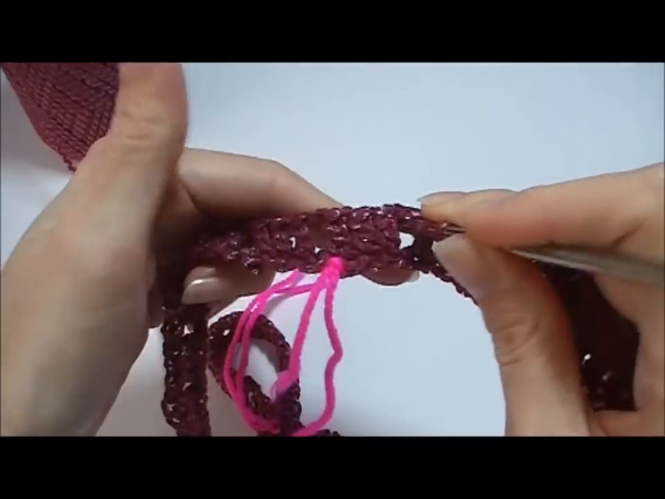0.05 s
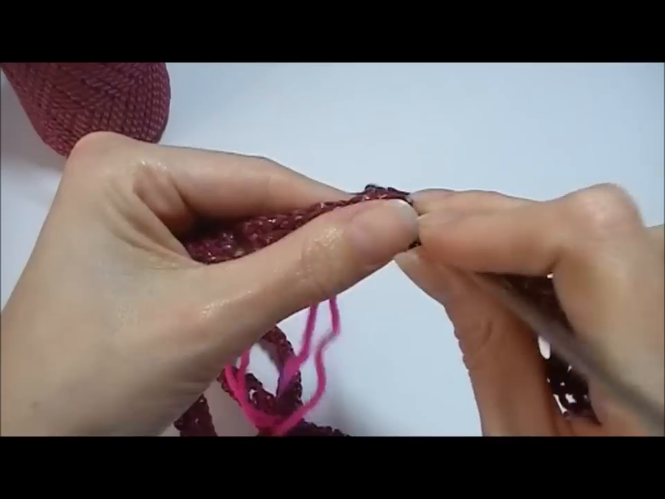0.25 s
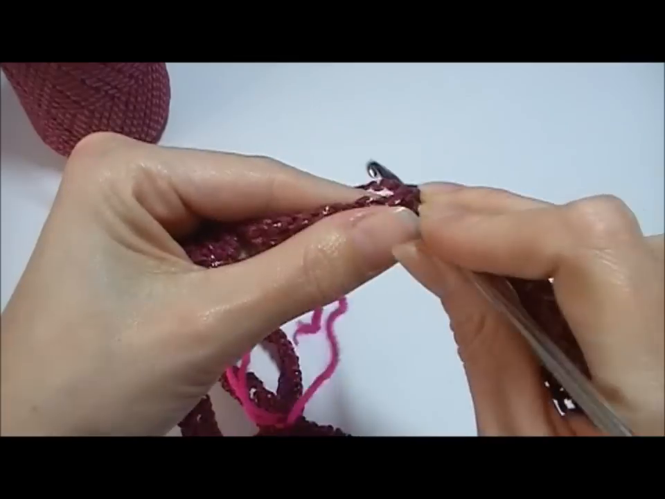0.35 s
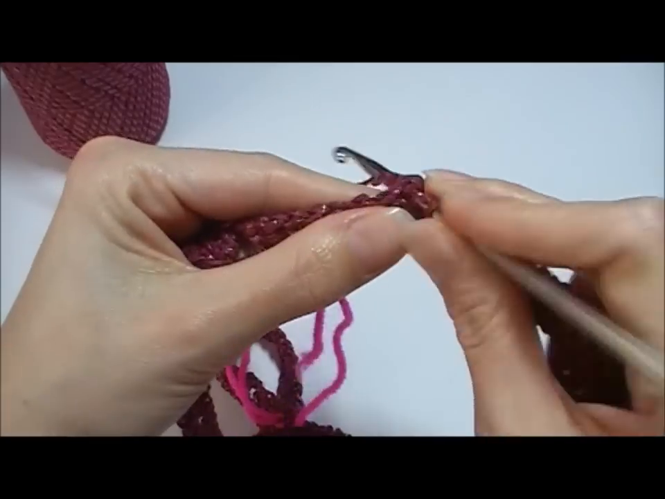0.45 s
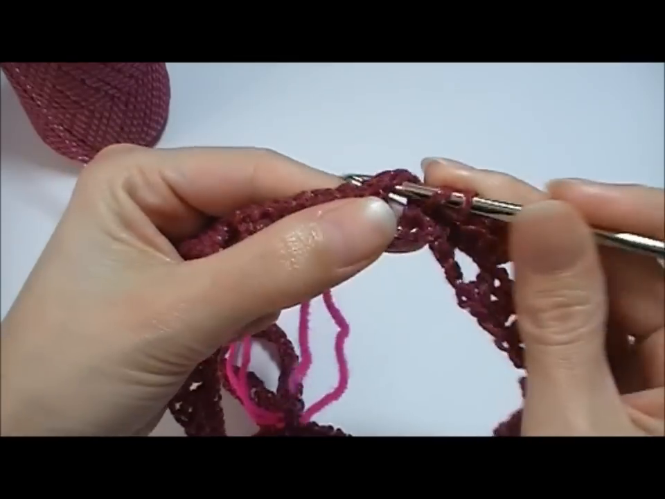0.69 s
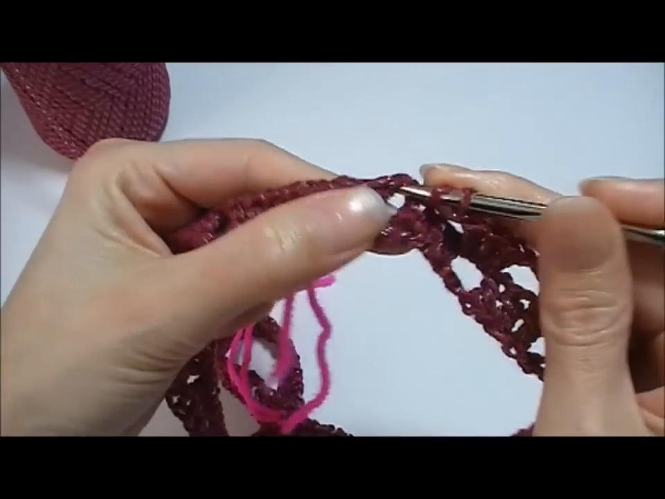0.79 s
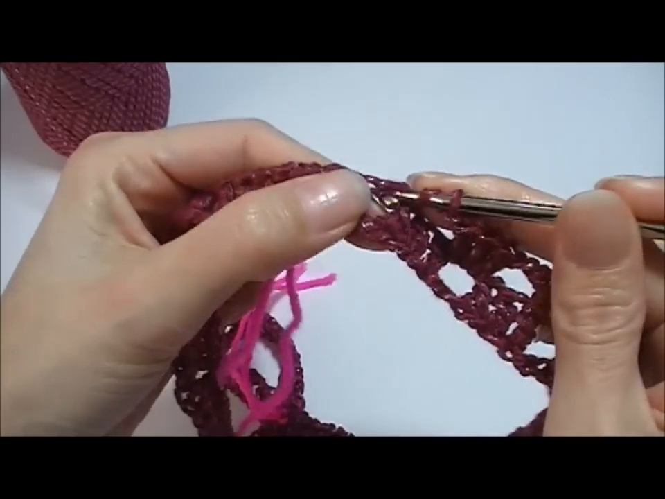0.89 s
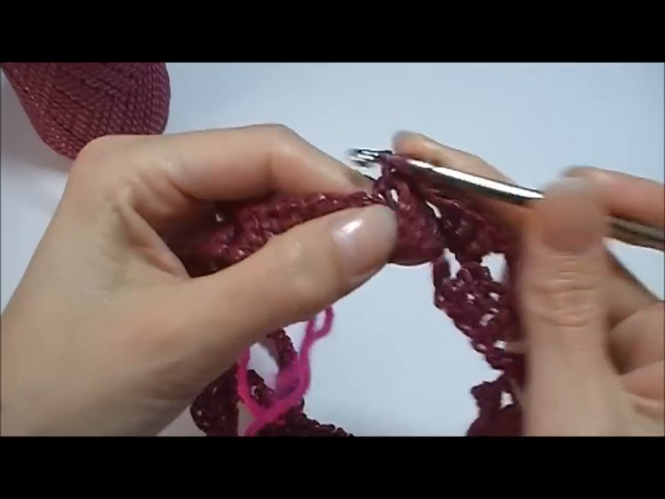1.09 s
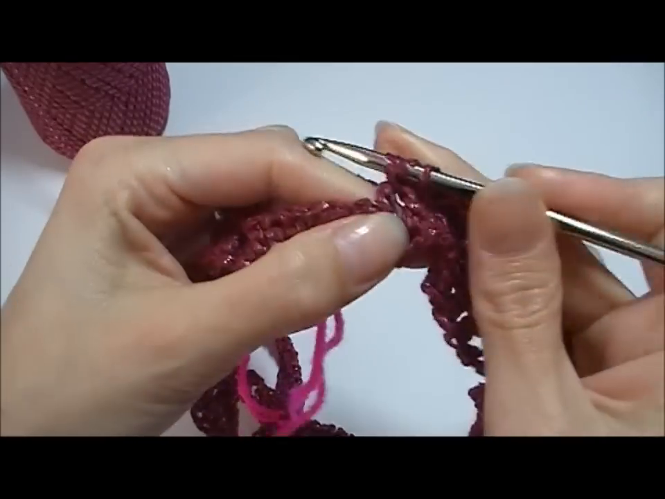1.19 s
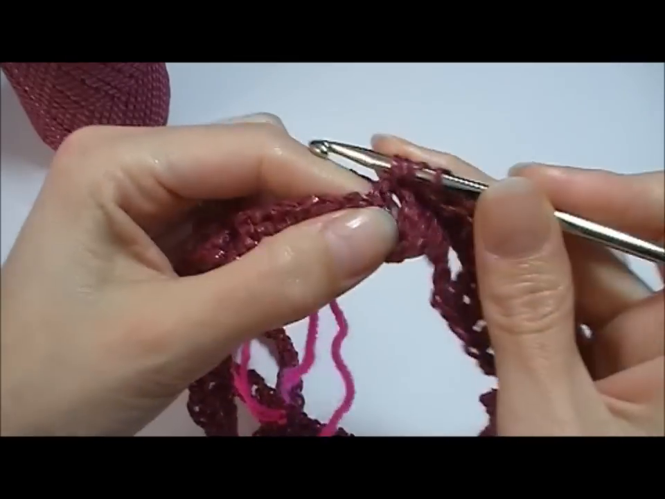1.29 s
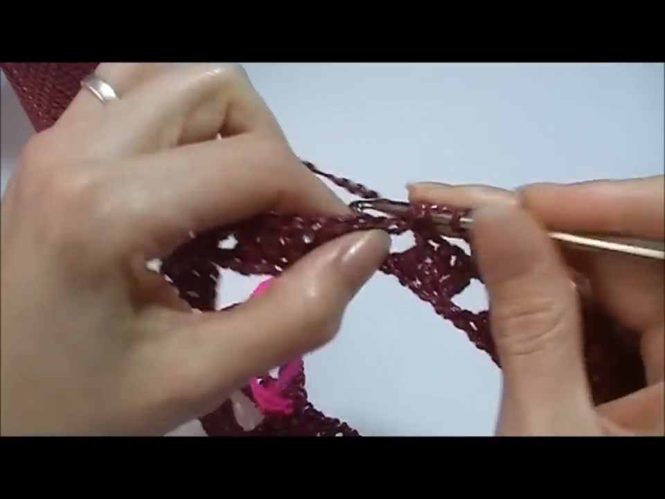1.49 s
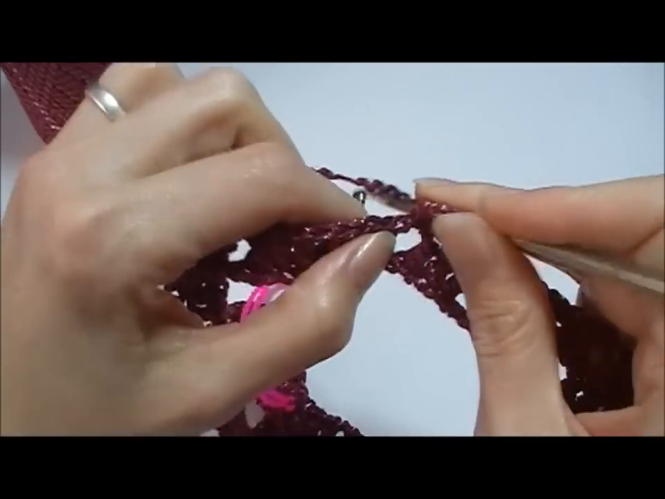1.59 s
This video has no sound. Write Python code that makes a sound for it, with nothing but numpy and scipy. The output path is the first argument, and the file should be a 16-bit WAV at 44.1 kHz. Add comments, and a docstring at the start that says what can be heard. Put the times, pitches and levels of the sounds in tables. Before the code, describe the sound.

Close to the microphone, a metal crochet hook gives one sharp click and a low bump. Yarn then slides over hook and fingers with soft rustles, tiny scratches and several dull knocks, above a quiet room's wide, steady noise.

```python
"""A metal crochet hook works yarn over a table, close up in a quiet room, in stereo.
The hook clicks once, with a low bump after it; two pairs of dull knocks follow, then two faint ones.
Yarn rustles softly as it slides over hook and fingers, fibres snag and the fabric shifts,
above wide, steady room noise."""
import sys
import numpy as np
from scipy import signal
from scipy.fft import rfft, irfft
from scipy.io import wavfile

SR = 44100
rng = np.random.default_rng(int(sys.argv[2]) if len(sys.argv) > 2 else 0)


def materialize(psi):
    """Save the field psi as 16-bit PCM at rate SR to the path in sys.argv[1].

    A 1-D psi becomes a single channel; in a 2-D psi each row is a channel.
    """
    bounded = np.clip(np.atleast_2d(psi).T, -1, 1)
    quanta = np.round(bounded * 32767).astype(np.int16)
    wavfile.write(sys.argv[1], SR, quanta)


N = 72765
T, HZ = np.arange(N) / SR, np.fft.rfftfreq(N, 1 / SR)
CLICK_S = 0.22585
HOOK_RIGHT_LEAD_S, HOOK_RIGHT_DB = 18e-6, -1.5


def amp(db):
    """dB to gain."""
    return 10 ** (np.asarray(db) / 20)


def unit(x):
    """Scale to rms 1."""
    return x / np.sqrt(np.mean(x ** 2) + 1e-20)


def gain_at(colour, hz):
    """Gain of a (f/Hz, level/dB) curve, interpolated over log f."""
    f, db = np.transpose(colour)
    return amp(np.interp(np.log(hz + 1), np.log(f + 1), db))


def noise(colour):
    """Steady coloured noise, rms 1."""
    return unit(irfft(rfft(rng.standard_normal(N)) * gain_at(colour, HZ), N))


def delay(x, s):
    """Fractional-sample delay."""
    hz = np.fft.rfftfreq(2 * N, 1 / SR)
    return irfft(rfft(x, 2 * N) * np.exp(-2j * np.pi * hz * s), 2 * N)[:N]


def convolve(x, response):
    """Convolution, cut to N samples."""
    return signal.fftconvolve(x, response)[:N]


def impulse(colour, size=2048):
    """Causal coloured pulse, energy 1."""
    log_gain = np.log(gain_at(colour, abs(np.fft.fftfreq(size, 1 / SR))))
    pulse = np.fft.ifft(np.exp(np.conj(signal.hilbert(log_gain)))).real
    return np.pad(pulse / np.linalg.norm(pulse), (0, N - size))


def mode(hz, t60_s, age_s):
    """Damped sine."""
    return np.exp(-np.log(1000) * age_s / t60_s) * np.sin(2 * np.pi * hz * age_s)


def tail(t60_s):
    """Decaying noise, energy 1."""
    burst = rng.standard_normal(N) * np.exp(-np.log(1000) * T / t60_s)
    return burst / np.linalg.norm(burst)


def room(x, t60_s):
    """Dense reflections, independent per channel."""
    return np.array([convolve(x, tail(t60_s)) for _ in range(2)])


def swells(rows, shape=2.6):
    """Envelope of hand movements; shape > 2 is flatter and ends more abruptly than a bell curve."""
    power = sum(amp(db) ** 2 * np.exp(-abs((T - s) / half_s) ** shape) for s, half_s, db in rows)
    return np.sqrt(power)


def room_noise():
    """Wide, steady air noise with a faint hum."""
    # noise common to both channels: f/Hz, relative level/dB
    mid_colour = [(20, -2.5), (45, -8), (80, -2.5), (120, -7), (200, -3.5), (260, -4), (420, -10.5),
                  (700, -12), (1400, -14.5), (3000, -17), (5000, -19), (9000, -24.5), (15500, -26.5)]
    # noise opposed between channels: f/Hz, relative level/dB
    side_colour = [(20, -12), (50, -14), (80, 0), (110, -3.5), (180, -0.5), (260, -4), (340, -1),
                   (420, -11.5), (470, -2.5), (620, -8.5), (900, -9), (1300, -13), (2500, -19),
                   (5000, -27.5), (10000, -35.5), (15500, -39)]
    # hum tones: f/Hz, level/dB
    hum = [(130, -66), (459, -76.5)]
    mid, side = amp(-51) * noise(mid_colour), amp(-44.5) * noise(side_colour)
    mid += sum(amp(db) * np.sqrt(2) * np.sin(2 * np.pi * (hz * T + rng.random())) for hz, db in hum)
    return np.array([amp(-0.5) * (mid + side), amp(-1.5) * (mid - side)])


def hook_click():
    """One hard tick with a damped metal ring, close reflections and a faint room tail."""
    # tick spectrum: f/Hz, relative level/dB
    tick_colour = [(100, -14), (550, -22), (850, -11.5), (1400, -14.5), (2300, -11), (3100, -15.5),
                   (4200, -12), (4950, -1.5), (5750, -11), (6400, -12.5), (7200, -8.5), (8200, -3.5),
                   (10500, 0.5), (12300, 0.5), (13200, -5.5), (15300, -9), (16500, -5.5)]
    # room return: f/Hz, relative level/dB
    room_colour = [(100, -7), (1000, 1), (2700, -2), (3600, -5), (4900, -4), (6200, -7), (8500, 1),
                   (11700, -1), (12400, 6), (13500, -4), (15500, -20)]
    # hook modes: f/Hz, level/dB, t60/s, right gain (negative: opposed)
    modes = [(5140, -36, 0.0068, 0.96), (10900, -24, 0.0065, -0.9), (12050, -19.5, .010, -0.89)]
    # reflections off hands, table and camera: delay/s, left/dB, right/dB
    reflections = [(.00046, -17, -8), (.00098, -10, -25), (.00174, -11, -29)]
    tick, channels = impulse(tick_colour), []
    for is_right, reverb in enumerate(room(impulse(room_colour), t60_s=0.26)):
        ring = sum((right_gain if is_right else 1) * amp(db) * mode(hz, t60_s, T)
                   for hz, db, t60_s, right_gain in modes)
        echoes = sum(amp(levels_db[is_right]) * delay(tick, s) for s, *levels_db in reflections)
        channels.append(tick + ring + echoes + amp(-13.5) * reverb)
    scatter = amp(-1.5) * convolve(tick, tail(t60_s=0.011))
    left, right = np.array(channels) + scatter
    right = amp(HOOK_RIGHT_DB) * delay(right, CLICK_S - HOOK_RIGHT_LEAD_S)
    return amp(-1.5) * np.array([delay(left, CLICK_S), right])


def bump(rise_s=0.0068, right_db=-15):
    """Low modes dying away after the click, stronger on the left."""
    # low modes: f/Hz, level/dB, t60/s
    modes = [(82, -38.5, 0.21), (127.8, -39, 0.35), (179.7, -47.5, 0.48)]
    age_s = np.maximum(T - CLICK_S, 0)
    ring = sum(amp(db) * mode(hz, t60_s, age_s) for hz, db, t60_s in modes)
    ring *= np.minimum(age_s / rise_s, 1)
    return np.array([ring, amp(right_db) * ring])


def yarn_rustle(slips_per_s=9000, catch_s=0.006, catch_db=0.2, right_db=-0.5):
    """Dense, tiny fibre slips under each stroke; slight flutter as the strand catches and slides."""
    # yarn strokes: peak t/s, half length/s, level/dB; side-channel gain
    strokes = [(0.325, 0.028, -56.5, 0.9), (0.424, 0.057, -63, 1), (0.508, 0.017, -62, 1),
               (0.63, 0.11, -58, 1), (0.747, 0.047, -57.5, 1), (0.865, 0.05, -58, .05),
               (0.941, 0.018, -59, 0), (1.062, 0.077, -55, .05), (1.152, 0.029, -51.5, 0),
               (1.269, 0.04, -55, .05), (1.393, 0.051, -53.5, .05), (1.58, 0.22, -63, 1)]
    # slip spectrum: f/Hz, relative level/dB
    colour = [(500, -18), (2000, -4.5), (3500, -7), (5000, 0), (6200, -0.5), (8000, 2), (11000, 5),
              (12400, 5), (13500, -.5), (15500, -8)]
    strokes = np.array(strokes)
    slips = (rng.random((2, N)) < slips_per_s / SR) * rng.standard_normal((2, N))
    flutter = amp(catch_db * np.interp(T / catch_s, np.arange(N), rng.standard_normal(N)))
    envelope = swells(strokes[:, :3])
    mid, side = (envelope * unit(convolve(train * flutter, impulse(colour))) for train in slips)
    side *= np.interp(T, strokes[:, 0], strokes[:, 3])  # near mono at 0.85-1.42 s, as in coded audio
    return np.array([mid + side, amp(right_db) * (mid - side)])


def knocks(wall_delay_s=0.0063, wall_db=-15):
    """Soft blows, each a few low cycles that swell and die, answered by a near wall and the room."""
    # dull knocks: t/s, level/dB, f/Hz, rise/s, right gain/dB
    blows = [(0.3871, -25.5, 400, .0027, -19), (.4696, -35, 410, 0.0043, -14.5),
             (0.641, -30, 397, 0.00249, -3.5), (0.7243, -31.5, 395, .0028, -16),
             (1.169, -39.5, 426, 0.0033, -17), (1.3680, -43, 374, 0.003, -15)]
    # room return: f/Hz, relative level/dB
    room_colour = [(60, -3), (160, 0), (400, 10), (800, -0.5), (1200, -18), (3000, -38), (10000, -57)]
    near, hits = np.zeros((2, N)), np.zeros(N)
    for s, db, hz, rise_s, right_db in blows:
        age_s = np.maximum(T - s, 0)
        envelope = (age_s / rise_s * np.exp(1 - age_s / rise_s)) ** 3
        blow = -amp(db) * envelope * np.sin(2 * np.pi * hz * age_s)
        near += np.array([blow, amp(right_db) * blow]) + amp(wall_db) * delay(blow, wall_delay_s)
        hits[round((s + rise_s) * SR)] = amp(db)
    return near + amp(8.5) * room(convolve(hits, impulse(room_colour)), t60_s=0.36)


def snags():
    """Short bright scratches as fibres snag and slip off the hook."""
    # snags: t/s, level/dB
    events = [(.510, -31), (.556, -35), (.944, -38), (1.118, -37), (1.145, -31), (1.4284, -23)]
    # scratch spectrum: f/Hz, relative level/dB
    colour = [(1000, -16), (7000, -15), (10500, 8), (12500, -1), (15000, -27)]
    bursts = sum(amp(db) * delay(tail(t60_s=0.018), s) for s, db in events)
    scratch = convolve(bursts, impulse(colour))
    return np.array([delay(scratch, HOOK_RIGHT_LEAD_S), amp(HOOK_RIGHT_DB) * scratch])


def fabric_shifts():
    """Fabric moving in the hands: brief, dull, centred swells of noise."""
    # movements: peak t/s, half length/s, level/dB
    shifts = [(.765, 0.013, -57), (.972, 0.014, -53), (1.362, 0.019, -53.5)]
    # fabric spectrum: f/Hz, relative level/dB
    colour = [(40, -9), (150, -18), (250, -0.5), (380, -12), (700, -16), (2000, -21.5), (8000, -33)]
    return noise(colour) * swells(shifts)


def scene():
    """Stereo sum of all sources."""
    return room_noise() + hook_click() + bump() + yarn_rustle() + knocks() + snags() + fabric_shifts()


def record(dry):
    """Low-pass at 15850 Hz."""
    lowpass = signal.firwin(255, 15850, window=("kaiser", 9), fs=SR)
    return signal.oaconvolve(dry, lowpass[None], "same")


dry = scene()
out = record(dry)
materialize(out)
```